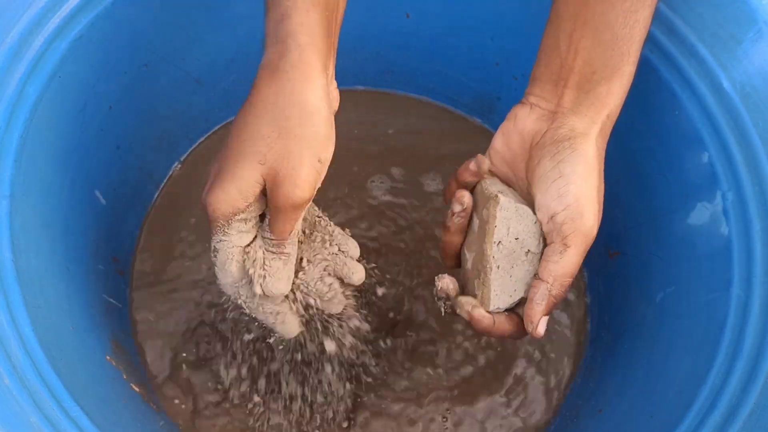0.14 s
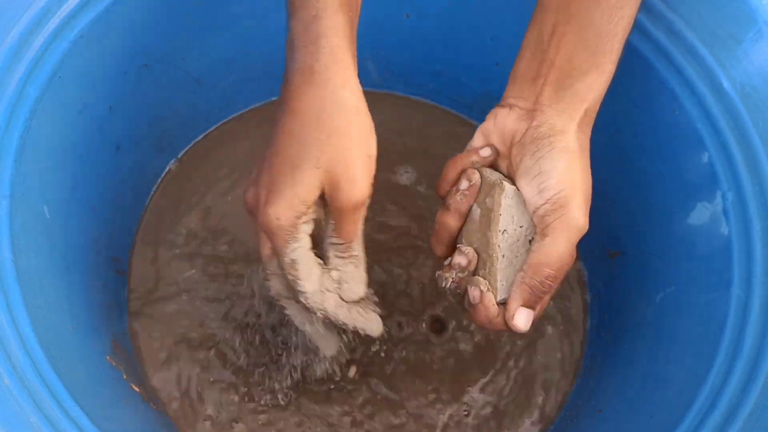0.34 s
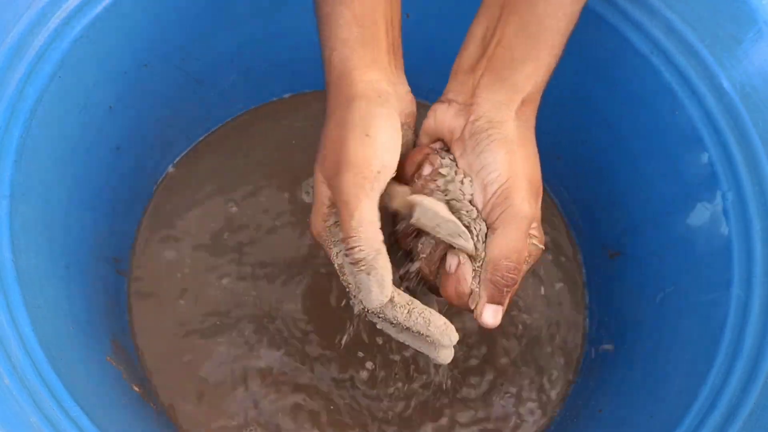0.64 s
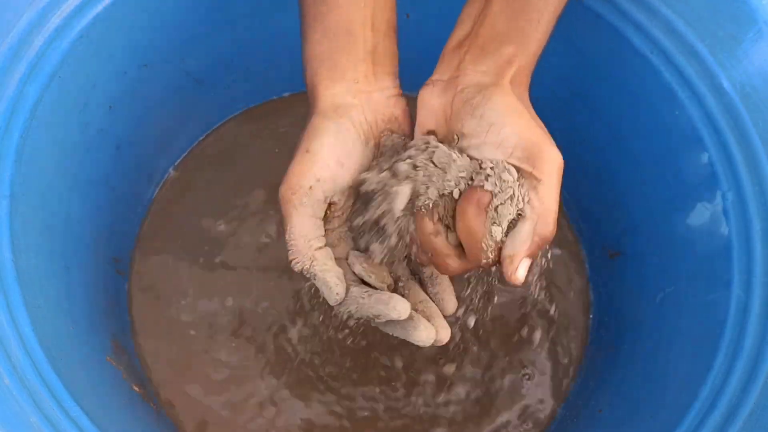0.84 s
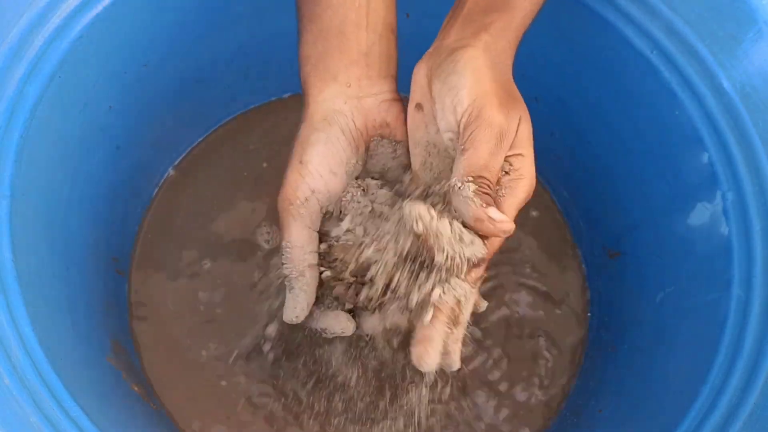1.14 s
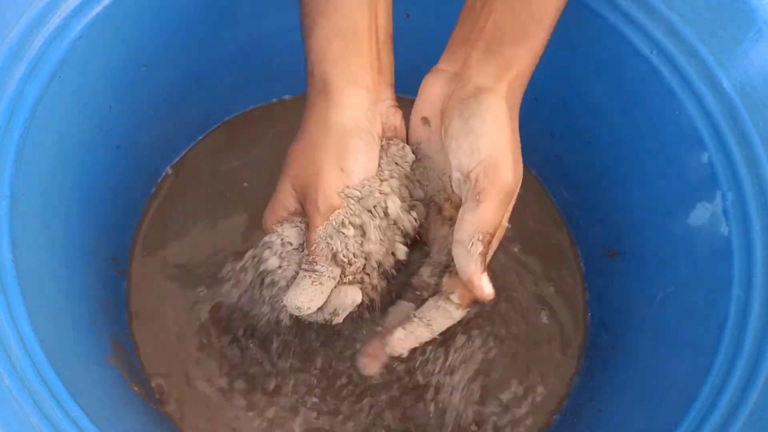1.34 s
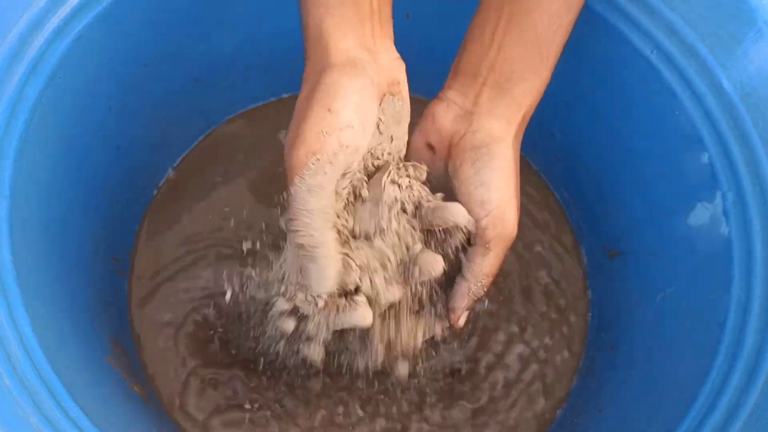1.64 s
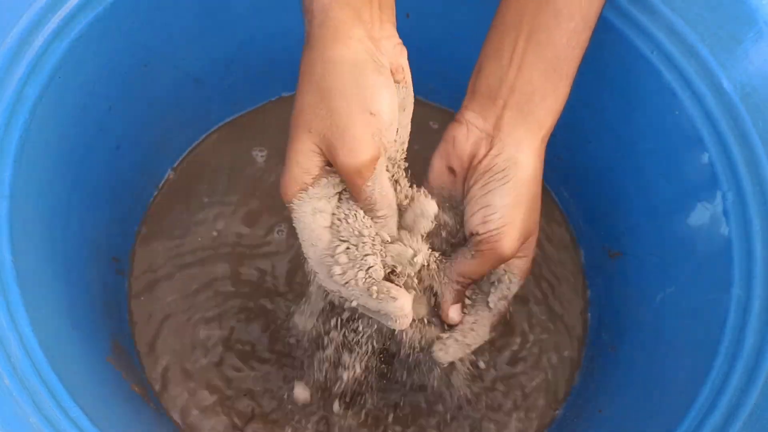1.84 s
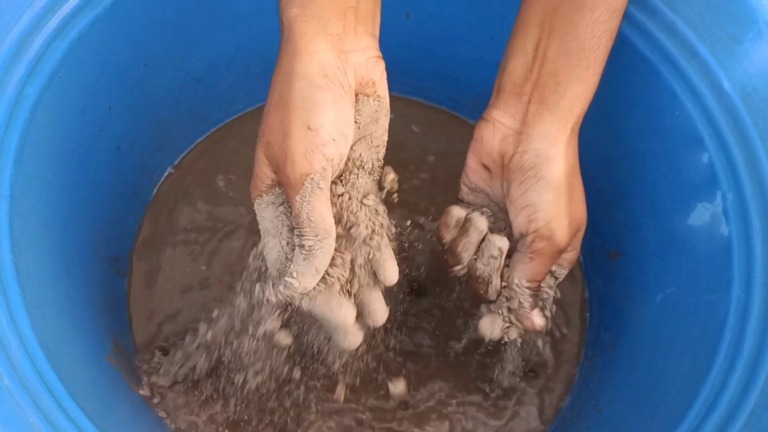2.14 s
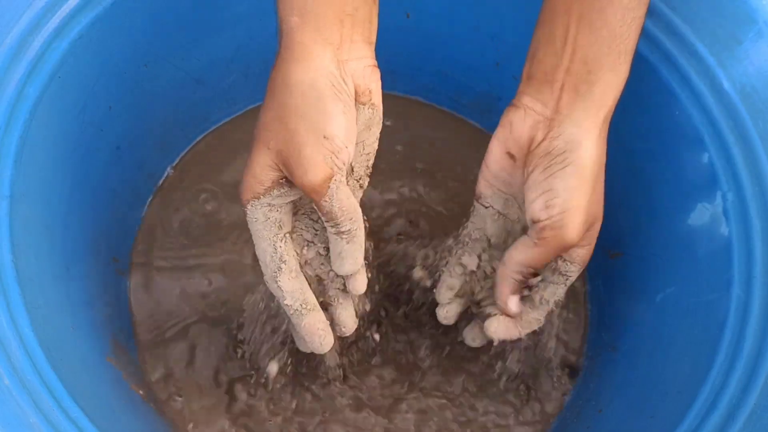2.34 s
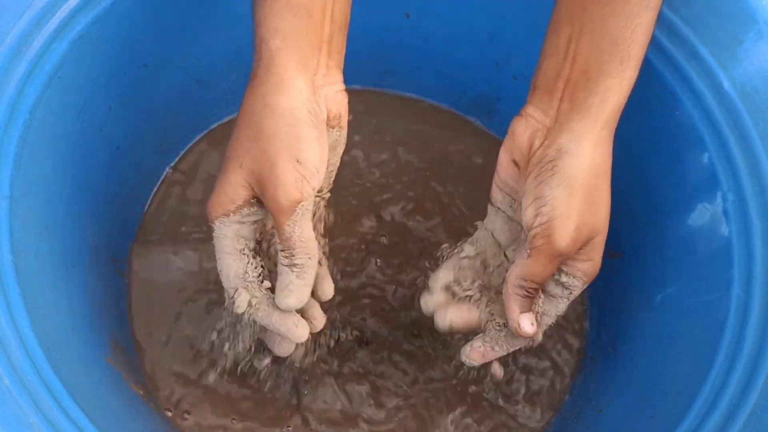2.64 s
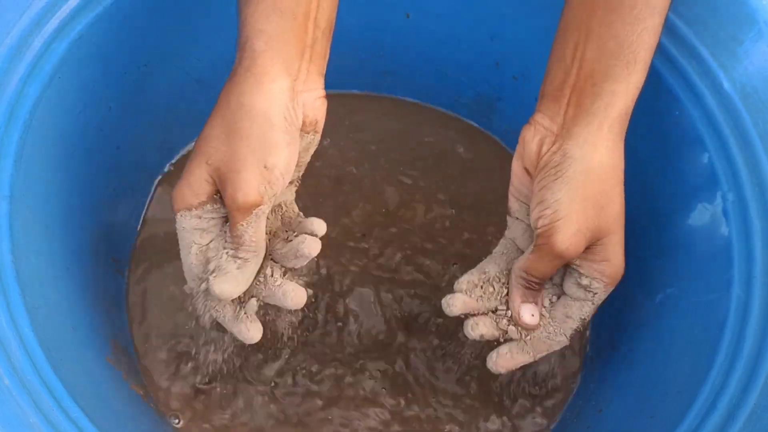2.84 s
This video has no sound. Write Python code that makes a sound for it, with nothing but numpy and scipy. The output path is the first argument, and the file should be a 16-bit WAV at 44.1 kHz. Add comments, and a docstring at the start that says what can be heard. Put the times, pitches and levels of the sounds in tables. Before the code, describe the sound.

Gritty clumps of dirt fall from hands into muddy water with wet plops and fine patter

```python
"""Crumbling dirt over a muddy tub

Hands crumble damp, sandy dirt over a plastic tub of muddy water, close by and outdoors. Lumps slap the
surface (filtered clicks and noise) and ring bubbles (dying sine waves); crumbs, grit and sand patter as
showers of tiny grains. Fine spray is short noise, and clods crunch as cracks ringing a set of tones.
Behind it lie a low rumble and still air, both filtered noise, and faint far-off tones made of sines."""
import sys
import numpy as np
from scipy import signal
from scipy.fft import rfft, irfft
from scipy.io import wavfile
from scipy.ndimage import uniform_filter1d

SR = 44100
rng = np.random.default_rng(int(sys.argv[2]) if len(sys.argv) > 2 else 0)


def to_wav(s):
    """Save 16-bit WAV."""
    ch = np.atleast_2d(s).T  # columns
    pcm = np.round(np.clip(ch, -1, 1) * 32767)  # PCM
    wavfile.write(sys.argv[1], SR, pcm.astype(np.int16))


N = 130095  # length in samples

# Colour tables give the balance between pitches: freq_hz, level_db (only the differences in level count)

# showers of dirt over time: time_s, crumb_and_grit_level_db, sand_level_db (before the trims below)
SHOWER_LEVELS = [(0, -30, -43.5), (.1, -63.5, -77), (.2, -44, -58.5), (.24, -44.5, -39.5), (.33, -39, -56),
                 (.42, -51.5, -68.5), (.53, -50.5, -78.5), (.68, -67.5, -75.5), (.75, -50, -55.5),
                 (.81, -56.5, -71), (.89, -58.5, -69.5), (1.0, -78, -99), (1.49, -80.5, -79),
                 (1.54, -50.5, -70), (1.63, -45.5, -47.5), (1.70, -62.5, -80), (1.95, -70, -86.5),
                 (2.025, -46.5, -53), (2.11, -56, -69.5), (2.35, -31.5, -45), (2.52, -34.5, -46.5),
                 (2.59, -39, -57.5), (2.67, -43.5, -77), (2.73, -51, -66), (2.94, -64, -96)]
# colour of the coarser grit: freq_hz, level_db
GRIT_COLOUR = [(200, -8), (600, -5.5), (850, -12), (1300, 3), (2200, -1.5), (4300, -2.5), (5100, -14.5),
               (9000, -42.5)]
# colour of the fine sand: freq_hz, level_db
SAND_COLOUR = [(2000, -9), (5100, -7), (6600, 9.5), (7800, -13), (9000, 3), (10300, -20.5), (15000, -22.5)]
# loudness of the low rumble and slosh: time_s, level_db
RUMBLE_LEVELS = [(0, -43), (.13, -55.5), (.35, -46.5), (.58, -61), (.9, -55), (1.05, -69.5), (1.48, -62.5),
                 (1.62, -46.5), (1.87, -65.5), (2.02, -58), (2.35, -45.5), (2.94, -57.5)]
# colour of the low rumble: freq_hz, level_db
RUMBLE_COLOUR = [(25, -23.5), (46, -10.5), (115, 4), (165, -7), (290, -1.5), (450, -18), (3000, -39)]
# colour of the still air: freq_hz, level_db
AIR_COLOUR = [(120, 2), (600, -17), (800, -13), (2100, -13.5), (2800, -25.5), (15000, -31)]
# lumps hitting the water: start_s, bubble_start_pitch_hz, bubble_level_db
LUMPS = [(.0013, 2570, -22.5), (0.0329, 1990, -18.5), (0.0367, 2350, -17.5), (0.153, 1110, -29),
         (0.1914, 1086, -29), (0.2318, 1017, -18.5), (0.24, 465, -17.5), (0.2576, 1176, -10.5),
         (0.2832, 3040, -18.5), (0.2964, 1010, -7), (0.3003, 1890, -14), (0.308, 494, -16),
         (0.3090, 340, -20), (0.3450, 1070, -8), (0.346, 315, -20.5), (0.3652, 1342, -12),
         (0.425, 1850, -32), (0.4968, 1830, -33), (0.619, 1760, -33.5), (0.6915, 1776, -30.5),
         (0.83, 3240, -33.5), (0.8475, 1680, -39.5), (1.166, 3965, -41), (1.2715, 1040, -35.5),
         (1.5130, 2540, -29.5), (1.531, 3440, -18), (1.5392, 3780, -19), (1.55, 2490, -17.5),
         (1.582, 1884, -18.5), (1.588, 1810, -25), (1.6190, 3400, -18.5), (1.6325, 2350, -23.5),
         (1.691, 1990, -31), (1.8100, 3910, -35), (1.879, 3890, -36), (1.9711, 2550, -27),
         (1.9900, 3950, -23.5), (2.007, 2370, -24.5), (2.0216, 2090, -28.5), (2.1570, 2503, -27),
         (2.1844, 1865, -22.5), (2.2298, 1430, -19.5), (2.2504, 1090, -15.5), (2.2873, 2310, -19),
         (2.304, 2300, -19), (2.3130, 1106, -13), (2.3173, 1022, -16), (2.327, 1770, -18),
         (2.3452, 1314, -13), (2.371, 1720, -17.5), (2.3750, 2540, -13), (2.3750, 685, -24),
         (2.402, 2520, -17), (2.4200, 2740, -16), (2.44, 2480, -16), (2.4618, 1840, -9.5),
         (2.4725, 1032, -11), (2.4757, 537, -21), (2.5040, 2410, -18.5), (2.5163, 2060, -17),
         (2.5363, 2300, -17.5), (2.5478, 1660, -18.5), (2.56, 2780, -20.5), (2.6108, 1500, -25.5),
         (2.6299, 1776, -21), (2.6519, 1850, -15), (2.6665, 1490, -15.5), (2.6779, 1403, -16.5),
         (2.6921, 1870, -20), (2.770, 2370, -30.5), (2.835, 1078, -34)]
# colour of a slap on the water: freq_hz, level_db
SLAP_COLOUR = [(100, -22.5), (430, 6), (800, -13.5), (1200, 12.5), (4200, 1.5), (5100, -14.5), (6500, -8.5),
               (10000, -24), (15000, -17)]
# colour of the tub's reflections: freq_hz, level_db
TUB_COLOUR = [(100, -3.5), (350, 4), (650, 2.5), (850, -4), (1200, -11), (5200, -15)]
# spits of fine spray: start_s, level_db, decay_s (time to fall to 37 %)
SPRAYS = [(0.3063, -9.5, 0.0031), (1.552, -41.5, 0.011), (2.331, -40, 0.0061), (2.3713, -36.5, 0.0094),
          (2.437, -32.5, 0.0023)]
# colour of the spray: freq_hz, level_db
SPRAY_COLOUR = [(2000, -23.5), (4000, -11.5), (5100, -15), (6400, 3), (7300, -13.5), (8500, -5),
                (10300, -18.5), (12300, -13.5)]
# the hands crushing dirt: peak_s, level_db, release_s (time to fall to 37 %)
CRUSHES = [(0.747, -28.5, 0.0079), (0.835, -52, 0.045), (1.544, -40.5, 0.029), (2.129, -53.5, 0.2)]
# tones that a cracking clod rings: pitch_hz, level_db, t60_s (time to fall by 60 dB)
CLOD_MODES = [(226, -9.5, 0.23), (315.3, 4.5, 0.14), (471, -8, 0.058), (663, 1, 0.071), (1020, -7.5, 0.085),
              (1590, 6.5, 0.024)]
# a far-off whine: time_s, middle_pitch_hz, level_db
WHINE = [(1.15, 612, -69.5), (1.7, 617, -57), (1.9, 616.5, -72.5), (2.2, 655, -46.5), (2.45, 670, -45)]
# a brief faint whistle: time_s, middle_pitch_hz, level_db
WHISTLE = [(1.6, 1070, -60), (1.77, 1006, -53.5), (1.82, 1022, -69)]
# a far-off reedy tone: time_s, middle_base_pitch_hz, level_db
REEDY_TONE = [(2.45, 556.6, -72), (2.58, 544.7, -49), (2.82, 550, -55), (2.93, 542, -75)]
# overtones of the reedy tone: multiple_of_base_pitch, middle_level_db
REEDY_PARTIALS = [(2, 3), (3, -3.5), (4, -5), (5, -1), (6, -4), (7, -12)]

# crumbs: each rings for some cycles until 60 dB down
CRUMBS_PER_S, CRUMB_SCATTER_DB, CRUMB_DB = 1300, 3.8, -4
CRUMB_LOW_HZ, CRUMB_HIGH_HZ, CRUMB_CYCLES = 1560, 4087, 11
# grit and sand; the rate and scatter also serve the cracks in a clod
GRIT_PER_S, GRIT_SCATTER_DB, GRIT_DB, SAND_DB = 830, 4, -9.5, -2.5
CLUMPS_PER_S, CLUMP_DB = 100, 2  # the dirt falls unevenly: pace and typical swing
AIR_DB = -70.5
# bubbles: cycles until 60 dB down, at most so long; the glide is the share the pitch rises in that time
BUBBLE_CYCLES, BUBBLE_LONGEST_S, BUBBLE_ONSET_S, BUBBLE_GLIDE = 33.6, .045, 0.0003, 0.013
BUBBLE_COLLAPSE = 1.327  # over 1, a bubble holds briefly and then dies abruptly
SOFT_ONSET_S, SOFT_DB = 0.002, -20.5  # bubbles of lumps lighter than this start more gently
SLAP_KNEE_HZ = 3400  # the lower the bubble lies under this, the deeper the slap
SLAP_DB, SLAP_GROWTH = 5, 1.526  # slap of a 0 dB lump; dB of slap per dB of lump
SPLATTER_S, SPLATTER_DB = 0.0047, -6
# fragments: level and pitch spread against the lump, and average delay
FRAGMENT_DB, FRAGMENT_OCTAVES, FRAGMENT_LAG_S = -17.5, .75, 0.0045
TUB_DB, TUB_T60_S = -12.5, 0.13
CRUSH_ATTACK_S, CRUSH_GRIT_DB = 0.0056, -13.5
TOP_HZ = 15300


def undb(db):
    """Turn decibels into a plain multiplier."""
    return 10 ** (np.asarray(db) / 20)


def unit(x):
    """Scale to an average strength (rms) of 1."""
    return x / np.sqrt(np.mean(x ** 2))


def curve(table, axis):
    """One column of a table, joined by straight lines in time."""
    rows = np.array(table)
    return np.interp(np.arange(N) / SR, rows[:, 0], rows[:, axis])


def add(out, at_s, x):
    """Mix a short sound in at a time."""
    i = max(int(at_s * SR), 0)
    out[i:i + len(x)] += x[:max(len(out) - i, 0)]


def colour(x, points, size=4096):
    """Filter through a colour table; the filter has unit energy and never sounds ahead of its input."""
    hz, db = np.array(points).T
    bins_hz = np.arange(size // 2 + 1) * SR / size
    log_gain = np.log(undb(np.interp(np.log(bins_hz + 1), np.log(hz), db)))
    # folding the cepstrum puts the filter's energy as early as possible
    cepstrum = irfft(log_gain)
    cepstrum[1:size // 2] *= 2
    cepstrum[size // 2 + 1:] = 0
    response = irfft(np.exp(rfft(cepstrum)))
    return signal.fftconvolve(x, response / np.linalg.norm(response))[:len(x)]


def fade(t, t60):
    """Die away by 60 dB in t60."""
    return np.exp(-np.log(1000) * t / t60)


def walk(rate):
    """Smooth random wander around 0, with rms 1."""
    k = int(SR / rate)
    smoothed = uniform_filter1d(rng.standard_normal(N), k)
    return unit(uniform_filter1d(smoothed, k))


def bubble(hz, t60, onset):
    """A trapped bubble: a sine whose pitch creeps up until it collapses."""
    t = np.arange(int(2 * t60 * SR) + 2) / SR
    ring = np.sin(2 * np.pi * hz * t * (1 + BUBBLE_GLIDE * t / t60 / 2))
    collapse = fade((t / t60) ** BUBBLE_COLLAPSE, 1)
    return ring * collapse * (1 - np.exp(-t / onset))


def grain_sizes(count, scatter_db):
    """Many small grains and a few large ones, with a cap on the largest."""
    return undb(scatter_db * np.minimum(rng.exponential(size=count), 4.5))


def ticks():
    """A dense train of tiny impacts at random moments, rms 1."""
    hits = rng.random(N) < GRIT_PER_S / SR
    signs = rng.choice([-1, 1], N)
    return unit(hits * signs * grain_sizes(N, GRIT_SCATTER_DB))


def shower():
    """Crumbs ring tiny bubbles; grit and sand tick on the surface."""
    grit = colour(ticks(), GRIT_COLOUR)
    sand = colour(ticks(), SAND_COLOUR)
    crumbs = np.zeros(N)
    sizes = grain_sizes(N, CRUMB_SCATTER_DB)
    pitch = rng.random(N)
    for i in np.flatnonzero(rng.random(N) < CRUMBS_PER_S / SR):
        hz = CRUMB_LOW_HZ * (CRUMB_HIGH_HZ / CRUMB_LOW_HZ) ** pitch[i]
        add(crumbs, i / SR, sizes[i] * bubble(hz, CRUMB_CYCLES / hz, BUBBLE_ONSET_S))
    coarse = undb(CRUMB_DB) * unit(crumbs) + undb(GRIT_DB) * grit
    coarse_shower = coarse * undb(curve(SHOWER_LEVELS, axis=1))
    sand_shower = sand * undb(SAND_DB + curve(SHOWER_LEVELS, axis=2))
    clumps = undb(CLUMP_DB * walk(CLUMPS_PER_S))
    return clumps * (coarse_shower + sand_shower)


def rumble():
    """Low rumble and slosh: deep noise that swells and sinks."""
    return colour(rng.standard_normal(N), RUMBLE_COLOUR) * undb(curve(RUMBLE_LEVELS, axis=1))


def still_air():
    """Still air: a steady, very faint noise."""
    return colour(rng.standard_normal(N), AIR_COLOUR) * undb(AIR_DB)


def lumps():
    """Each lump slaps the water, splatters and rings a bubble; higher bubbles go with slaps of less bass."""
    rings, slaps = np.zeros(N), np.zeros(N)
    t = np.arange(SR // 20) / SR
    for at, hz, db in LUMPS:
        onset = BUBBLE_ONSET_S + SOFT_ONSET_S / (1 + undb(db - SOFT_DB) ** 2)
        t60 = min(BUBBLE_CYCLES / hz, BUBBLE_LONGEST_S)
        add(rings, at, undb(db) * bubble(hz, t60, onset))

        click = 2 * (t == 0)
        splatter = undb(SPLATTER_DB) * rng.standard_normal(len(t)) * np.exp(-t / SPLATTER_S)
        cut_hz = min(hz * hz / SLAP_KNEE_HZ, hz)
        bass_cut = signal.butter(2, cut_hz, "high", fs=SR, output="sos")
        # heavy lumps slap hard, light ones mostly ring
        add(slaps, at, undb(SLAP_DB + SLAP_GROWTH * db) * signal.sosfilt(bass_cut, click + splatter))
    return rings + colour(slaps, SLAP_COLOUR)


def fragments(count=8):
    """Bits shed by each lump land just after it and ring short bubbles, mostly higher in pitch."""
    out = np.zeros(N)
    for at, hz, db in LUMPS:
        for lag, step in zip(rng.exponential(size=count), rng.standard_normal(count)):
            pitch = min(hz * 2 ** (FRAGMENT_OCTAVES * (.5 + step)), CRUMB_HIGH_HZ)
            level = undb(db + FRAGMENT_DB - 2 * lag)  # later bits are fainter
            ring = bubble(pitch, CRUMB_CYCLES / pitch, BUBBLE_ONSET_S)
            add(out, at + lag * FRAGMENT_LAG_S, level * ring)
    return out


def tub_echo(x):
    """The tub's answer: dense reflections, modelled as dying noise, that blur each sound."""
    t = np.arange(SR // 2) / SR
    tail = rng.standard_normal(len(t)) * fade(t, TUB_T60_S) * (t > .002)
    return signal.fftconvolve(colour(x, TUB_COLOUR), tail / np.linalg.norm(tail))[:N]


def sprays():
    """Jets of fine spray: short, bright spits of noise that die away at once."""
    out = np.zeros(N)
    t = np.arange(SR // 20) / SR
    for at, db, decay in SPRAYS:
        add(out, at, undb(db) * rng.standard_normal(len(t)) * np.exp(-t / decay))
    return colour(out, SPRAY_COLOUR)


def clod():
    """Swells of tiny fractures ring the clod and the cupped hands."""
    t = np.arange(N) / SR
    swells = np.zeros(N)
    for at, db, release in CRUSHES:
        swells += undb(db) * np.exp(-np.maximum((at - t) / CRUSH_ATTACK_S, (t - at) / release))
    cracks = ticks() * swells

    t = t[:SR // 2]
    body = sum(undb(db) * np.cos(2 * np.pi * hz * t) * fade(t, t60) for hz, db, t60 in CLOD_MODES)
    crunch = signal.fftconvolve(cracks, body / np.linalg.norm(body))[:N]
    return crunch + undb(CRUSH_GRIT_DB) * colour(cracks, SLAP_COLOUR)


def far_off_tone(track, partials, waver):
    """A faint tone: sines at multiples of one wavering pitch, each with a wandering level."""
    t = np.arange(N) / SR
    pitch = curve(track, axis=1) * (1 + waver * walk(153))  # waver: typical swing as a share of pitch
    phase = 2 * np.pi * np.cumsum(pitch) / SR
    sounding = (t > track[0][0]) * (t < track[-1][0])
    tone = sum(undb(db + 3.5 * walk(70)) * np.sin(round(k) * phase) for k, db in partials)
    return sounding * undb(curve(track, axis=2)) * tone


def far_off_tones():
    """A whine and a whistle, each a single sine, and a reedy tone of several."""
    whine = far_off_tone(WHINE, [(1, 0.0089)], .045)
    whistle = far_off_tone(WHISTLE, [(1, 0.005)], .012)
    reedy = far_off_tone(REEDY_TONE, REEDY_PARTIALS, .006)
    return whine + whistle + reedy


def scene():
    """The dirt and its reflections in the tub, over the quiet background."""
    dirt = lumps() + fragments() + sprays() + clod() + shower()
    reflections = undb(TUB_DB) * tub_echo(dirt)
    background = rumble() + still_air() + far_off_tones()
    return (dirt + reflections + background)[None]


def record(dry):
    """A steep filter cuts the highest treble."""
    return signal.sosfilt(signal.ellip(10, .2, 80, TOP_HZ, fs=SR, output="sos"), dry)


dry = scene()
out = record(dry)
to_wav(out)
```